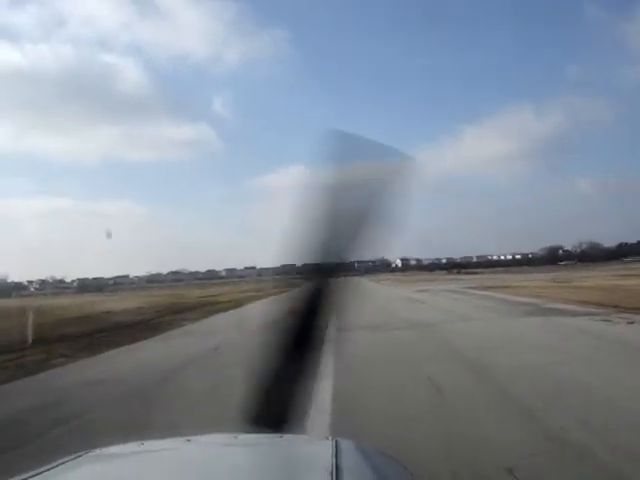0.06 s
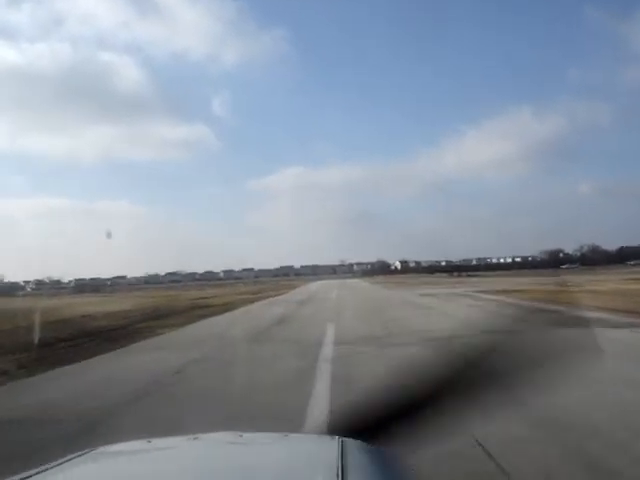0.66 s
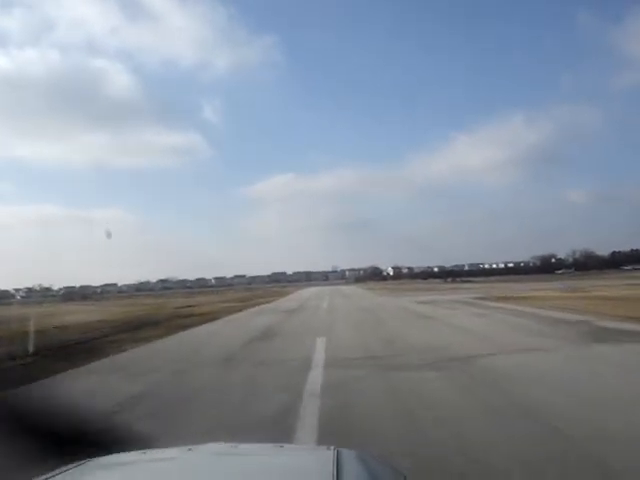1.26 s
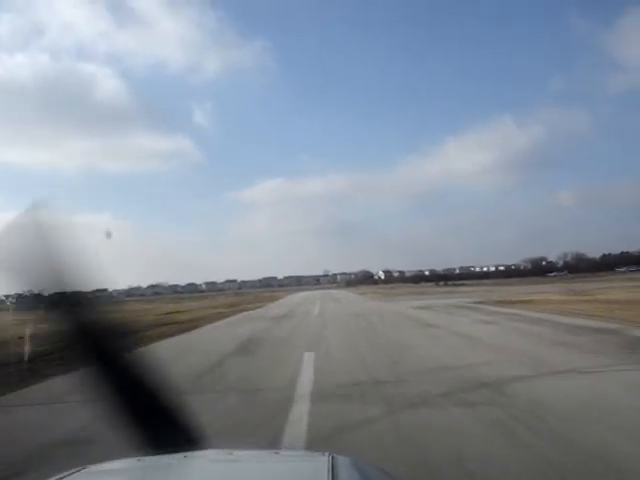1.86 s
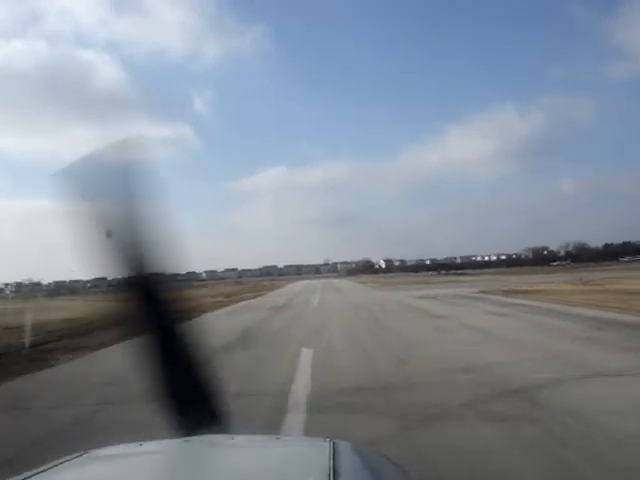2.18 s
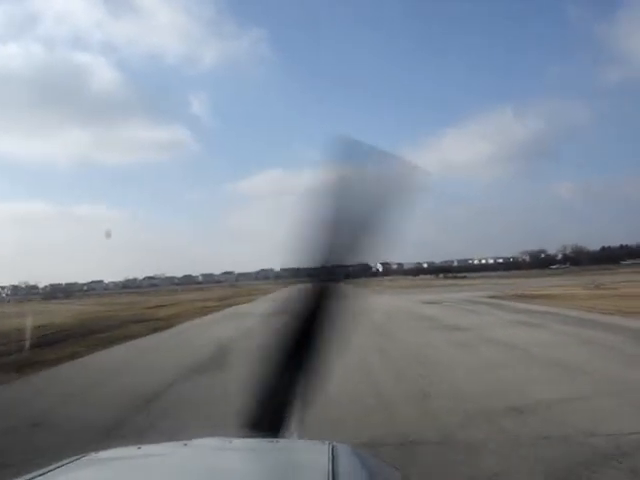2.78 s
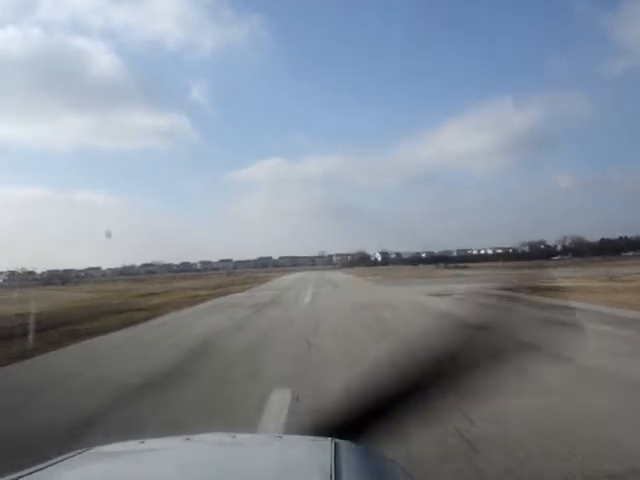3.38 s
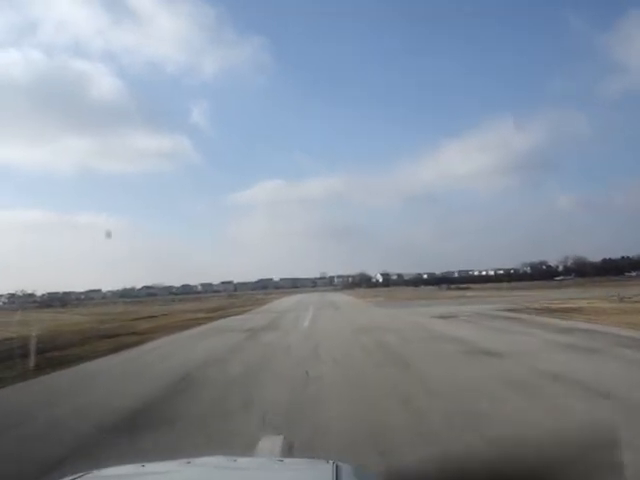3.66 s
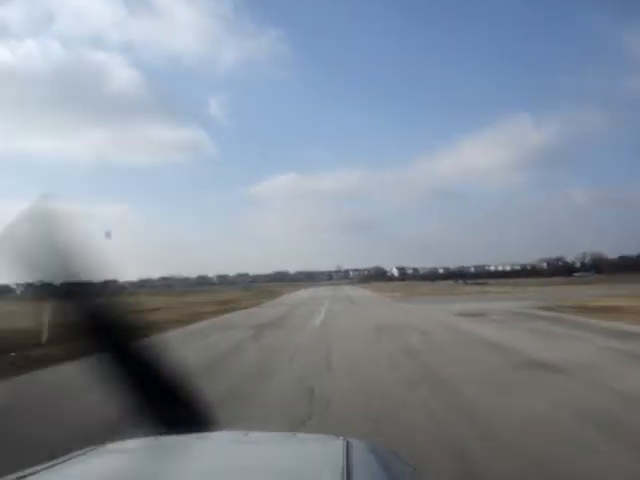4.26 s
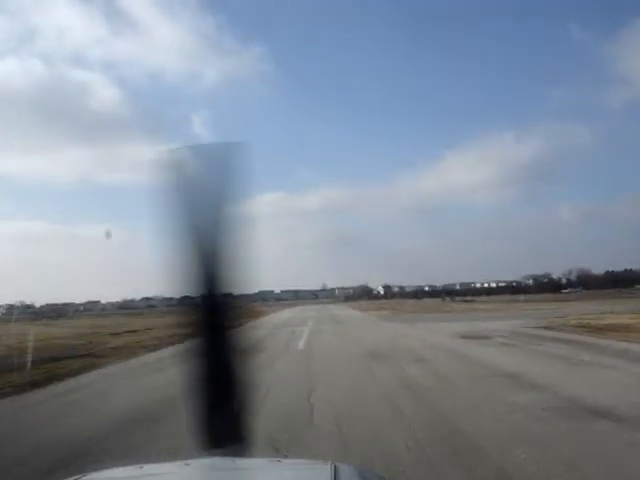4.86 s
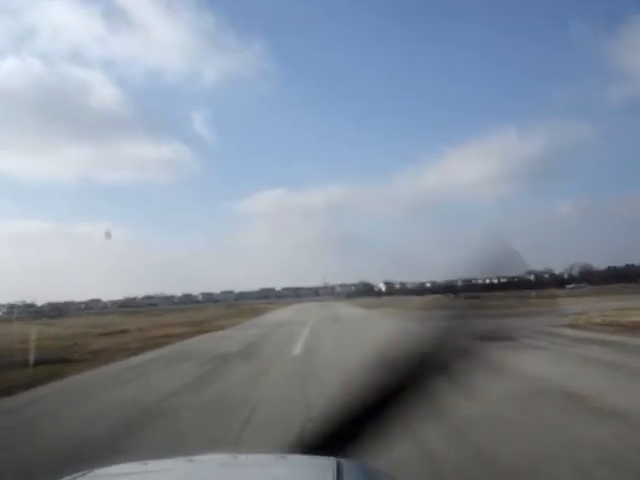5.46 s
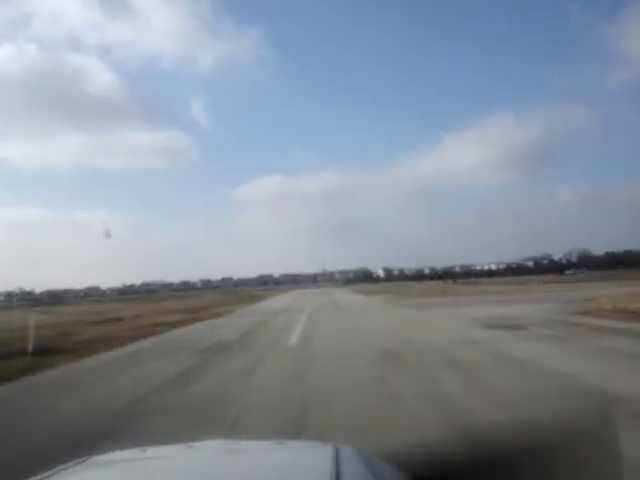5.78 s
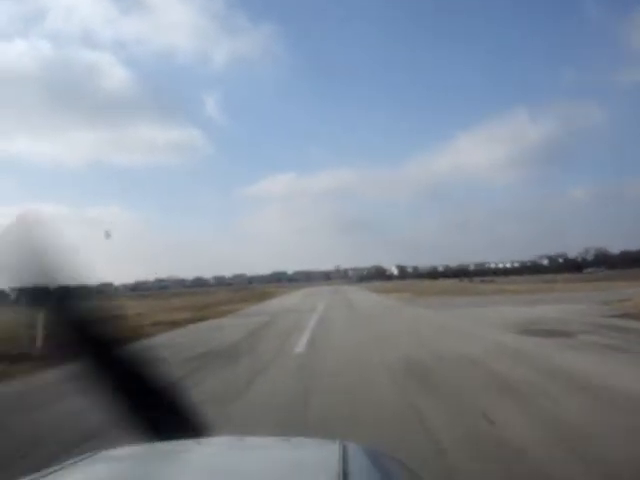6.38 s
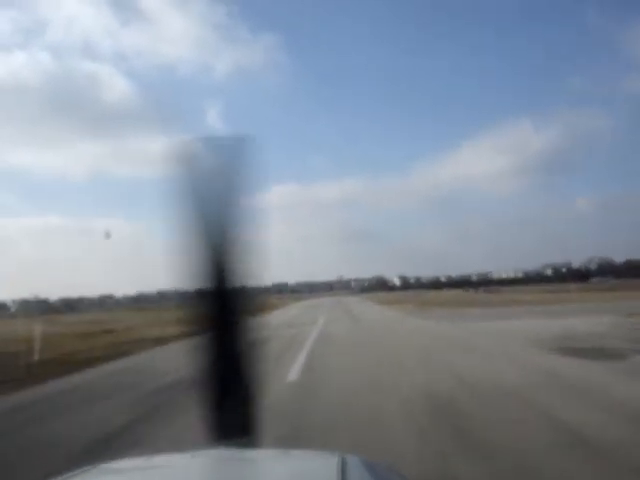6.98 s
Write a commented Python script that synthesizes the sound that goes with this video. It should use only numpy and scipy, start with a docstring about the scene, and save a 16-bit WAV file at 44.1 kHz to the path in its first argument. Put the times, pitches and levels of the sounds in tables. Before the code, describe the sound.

A light aircraft's piston engine and propeller drone for the whole seven seconds, heard from inside the cockpit while taxiing. The engine holds a low, nearly constant speed, with a fast throb, a broad roar and a quickly repeating pattern of knocks that ring in the cabin. The knocks hit harder at about 2 and 3 seconds and briefly soften just after 4. A light panel buzz and a faint, rapid scraping keep time with the engine.

Underneath, tyres rumble on the pavement, swelling briefly over rough patches between 3 and 4.5 seconds and again from about 5.5 to 6.3. Air from the propeller hisses softly on the windscreen. Faint, thin whines hang above, one swelling around 1.5 seconds and again near 6.3. Small dry ticks sound close by at about 0.4, 4.2 and 6.4 seconds.

```python
"""A throbbing, droning engine, heard from the cockpit of a light aircraft taxiing at about 910 rpm.
Four cylinders and a two-blade propeller push the air 30 times a second. The cabin drones, and the same
knocks return every engine cycle (four firings), now and then harder or softer. Tyres rumble over the
pavement, air from the propeller hisses, thin whines hang above and something small ticks a few times."""
import sys
import numpy as np
from scipy.fft import rfft, irfft, next_fast_len
from scipy.io import wavfile
from scipy.ndimage import uniform_filter1d, minimum_filter1d, map_coordinates

SR = 44100
rng = np.random.default_rng(int(sys.argv[2]) if len(sys.argv) > 2 else 0)


def generate_wav(signal):
    """Clip the signal to [-1, 1] and save it as 16-bit WAV at the path in sys.argv[1]."""
    frames = np.transpose(np.atleast_2d(signal))
    scaled = np.clip(frames, -1, 1) * 32767
    pcm = np.round(scaled).astype(np.int16)
    wavfile.write(sys.argv[1], SR, pcm)


N = 309582


def amp(db):
    """Turn decibels into a gain."""
    return 10 ** (np.asarray(db) / 20)


def unit(x):
    """Scale x to an average (rms) level of 1."""
    return x / np.sqrt(np.mean(x ** 2) + 1e-20)


def curve(rows):
    """Join (seconds, value) rows with straight lines, one value per sample."""
    return np.interp(np.arange(N) / SR, *np.transpose(rows))


def wobble(rate):
    """A smooth curve through `rate` random values a second."""
    return map_coordinates(rng.standard_normal(int(N * rate / SR) + 4), [np.arange(N) * rate / SR])


def noise():
    """White noise at level 1."""
    return rng.standard_normal(N)


def filtered(x, response):
    """Multiply each frequency in x by response(hz)."""
    size = next_fast_len(N + SR // 2)
    return irfft(rfft(x, size) * response(np.fft.rfftfreq(size, 1 / SR)), size)[:N]


def coloured(x, spectrum):
    """Shape x by (Hz, dB) rows, fading above the last row, and scale it to level 1."""
    row_hz, row_db = np.transpose(spectrum)

    def response(hz):
        db = np.interp(np.log(hz + 1), np.log(row_hz + 1), row_db)
        return amp(db) / (1 + (hz / row_hz[-1] / 1.3) ** 8)
    return unit(filtered(x, response))


def tone(turns, db, phase=0):
    """A sine wave with one swing per turn, at an average (rms) level of db."""
    return amp(db) * np.sqrt(2) * np.sin(2 * np.pi * turns + phase)


def add(track, start_s, sound):
    """Mix a short sound into the track."""
    start = int(round(start_s * SR))
    if 0 <= start < N:
        track[start:start + len(sound)] += sound[:N - start]


def throb(firings, lag=0.13, unsteady_db=1.0):
    """Each firing and passing blade sends one suck-then-push wave through the cabin."""
    # The tones in that wave. Each row: multiple of the firing rate, level in dB.
    harmonics = [(1, -40.5), (2, -21.5), (3, -21.5), (4, -30), (5, -35.5)]
    return sum(tone(k * (firings - lag), db + unsteady_db * wobble(14)) for k, db in harmonics)


def drone(firings, unsteady_db=2, drift_radians=0.37):
    """Unequal cylinders add in-between tones; those near the cabin's own pitches stand out and waver."""
    # The tones that stand out. Each row: multiple of the firing rate, level in dB.
    cabin_tones = [(3.25, -34.5), (3.5, -37), (7, -42.5), (10, -40.5), (12, -42.5), (14, -36.5),
                   (14.25, -33.5), (14.5, -32.5), (14.75, -34), (16.25, -32), (16.5, -31), (17, -35.5),
                   (19, -40.5), (20.75, -36)]
    out = np.zeros(N)
    for multiple, db in cabin_tones:
        drift = drift_radians * wobble(8)
        level_db = db + unsteady_db * wobble(6)
        out += tone(multiple * firings, level_db, drift + rng.uniform(0, 2 * np.pi))
    return out


def knocks(firings, rise_s=0.0055, jitter_s=0.00022, scatter_db=1.4, burn_db=1.0, detune=0.015):
    """Engine and cover ring at the same points of each cycle; early knocks follow how hard it burns."""
    # One cycle's knocks. Each row: start in firings (0 to 4), pitch in Hz, peak level in dB.
    cycle_knocks = [(0.029, 990, -18), (.22, 1228, -25), (.55, 1440, -33.5), (0.999, 982, -15.5),
                    (1.018, 1622, -27), (1.079, 672, -18), (1.041, 1970, -26.5), (1.3, 1842, -23.5),
                    (1.531, 1808, -27), (1.85, 327, -25.5), (2.0, 697, -23), (2.56, 653, -19),
                    (3.048, 1010, -22.5), (3.55, 720, -15.5)]
    # Cycles that burn unusually hard or weakly. Each row: time in seconds, dB above the usual knock.
    odd_cycles = [(.56, 2), (.96, 2), (1.75, -1), (2.01, 3.5), (2.93, -4), (3.08, 6.5), (3.55, 2),
                  (4.25, -10), (6.1, 3), (6.89, 1.5)]
    t, clock = np.arange(SR // 25) / SR, np.arange(N) / SR
    envelope = (t / rise_s * np.exp(1 - t / rise_s)) ** 3
    cycle_starts = 4 * np.arange(firings[-1] // 4 + 1)
    burns_db = burn_db * rng.standard_normal(len(cycle_starts))
    for time_s, db in odd_cycles:
        cycle = int(np.interp(time_s, clock, firings) // 4)
        burns_db[cycle] = db
    out = np.zeros(N)
    for place, hz, db in cycle_knocks:
        times = np.interp(cycle_starts + place, firings, clock, right=N)  # skip knocks past the end
        peaks_db = db + burns_db * (place < 1.7)  # only the early part of the cycle
        chance = rng.standard_normal((len(times), 3))
        for start_s, peak_db, (late, louder, sharp) in zip(times, peaks_db, chance):
            ring = np.sin(2 * np.pi * hz * (1 + detune * sharp) * (t - rise_s))
            add(out, start_s + jitter_s * late, amp(peak_db + scatter_db * louder) * envelope * ring)
    return out


def exhaust(firings, repeat_share=0.29, level_db=-22):
    """Rushing gas, partly the same in each cycle, makes the cabin ring."""
    # Where the cabin rings. Each row: pitch in Hz, width in Hz, relative strength in dB.
    resonances = [(199.6, 46, -7), (441.2, 25, 1.5), (504, 30, -2), (587, 42, -2.5), (629, 42, 0.5),
                  (700, 65, 0), (765, 68, -4.5), (886, 49, -7.5), (1255, 43, -10), (1409, 43, -12.5),
                  (1550, 60, -13.5), (1838, 121, -9), (2410, 145, -18)]

    def cabin(hz):
        # squared: each resonance acts twice, so the gaps between them stay quiet
        return sum(amp(db) * (1.5j * hz * width / (pitch ** 2 - hz ** 2 + 1.5j * hz * width)) ** 2
                   for pitch, width, db in resonances)
    size = 4096  # samples in one cycle's noise pattern
    pattern = unit(irfft(np.exp(2j * np.pi * rng.random(size // 2 + 1))))
    repeating = map_coordinates(pattern, [firings / 4 % 1 * size], mode="grid-wrap")
    gas = np.sqrt(repeat_share) * repeating + np.sqrt(1 - repeat_share) * noise()
    return amp(level_db) * unit(filtered(gas, cabin))


def roar(firings, level_db=-24, per_firing_db=0.06, per_cycle_db=1):
    """The engine's moving parts make a broad noise that pulses gently with each cycle."""
    # The roar's tone colour. Each row: frequency in Hz, relative level in dB.
    spectrum = [(100, -29.5), (150, -7.5), (370, 0), (545, -3.5), (750, -1.5), (1000, -2.5), (1150, -8),
                (1350, -15.5), (1620, -6), (1980, -8), (2220, -12), (2500, -15.5), (3000, -16.5),
                (3800, -28)]
    pulse_db = per_firing_db * np.cos(2 * np.pi * (firings - 0.3))
    pulse_db += per_cycle_db * np.cos(2 * np.pi * (firings / 4 - 0.25))
    return amp(level_db) * coloured(noise() * amp(pulse_db), spectrum)


def tyres(level_db=-29, uneven_db=1, bump_s=0.05):
    """The wheels rumble, louder over rough pavement."""
    # The rumble's tone colour. Each row: frequency in Hz, relative level in dB.
    spectrum = [(12, -20.5), (28, -5.5), (60, -8.5), (100, -3.5), (135, 2), (200, -0.5), (280, -9),
                (500, -28)]
    # Rough patches. Each row: time in seconds, dB above the usual rumble.
    bumps = [(2.08, 2), (3.02, 5), (3.333, 7), (3.95, 4.5), (4.36, 9), (5.55, 6), (6.0, 5), (6.28, 6.5)]
    t = np.arange(N) / SR
    bumps_db = sum(db * np.exp(-0.5 * ((t - time_s) / bump_s) ** 2) for time_s, db in bumps)
    return amp(level_db + bumps_db + uneven_db * wobble(7.7)) * coloured(noise(), spectrum)


def rattle(firings, peak_db=-32, place=1.4, width=0.32):
    """A panel buzzes briefly after each cycle's loudest firing (place and width count in firings)."""
    from_peak = (firings - place + 2) % 4 - 2
    buzz = coloured(noise(), [(1400, -34.5), (1720, -13.5), (1845, 1.5), (1970, -13), (2400, -36.5)])
    return amp(peak_db) * np.exp(-0.5 * (from_peak / width) ** 2) * buzz


def scrape(firings, peak_db=-36, turns_per_firing=0.554, width_turns=0.069):
    """A part driven by the engine scrapes each time it turns, about 17 times a second."""
    spectrum = [(2300, -19.5), (2800, -9), (3080, -1), (3300, -12.5), (3520, -6), (3850, -19),
                (4500, -28)]
    from_peak = (turns_per_firing * firings - 0.3) % 1 - 0.5
    stroke = np.exp(-0.5 * (from_peak / width_turns) ** 2)
    return stroke * amp(peak_db + 0.61 * wobble(5.6)) * coloured(noise(), spectrum)


def propeller_wash(firings, level_db=-44, pulsing_db=1, flutter_db=1.0):
    """Air thrown back by the blades hisses on the windscreen."""
    # The hiss's tone colour. Each row: frequency in Hz, relative level in dB.
    spectrum = [(1500, -32), (3000, 0.5), (3900, -3.5), (4600, -1), (5600, -1.5), (6500, -7), (7500, -13),
                (8700, -17), (10000, -21.5)]
    gusts_db = pulsing_db * np.cos(2 * np.pi * (firings - 0.9)) + flutter_db * wobble(120)
    return amp(level_db + gusts_db) * coloured(noise(), spectrum)


def ticks(rise_s=0.0035):
    """Something small and close ticks: short bursts of bright noise."""
    # The dry ticks. Each row: start in seconds, level in dB.
    bursts = [(0.423, -34.5), (.466, -33), (4.071, -39.5), (4.259, -39), (4.275, -32.5), (6.41, -28.5),
              (6.45, -33)]
    envelope, t = np.zeros(N), np.arange(SR // 20) / SR
    for start_s, db in bursts:
        add(envelope, start_s, amp(db) * t / rise_s * np.exp(1 - t / rise_s))
    return envelope * coloured(noise(), [(1500, -24), (3500, 5), (5300, -1), (7000, -9), (10000, -16.5)])


def whines(waver_radians=0.36, flutter_db=1.8):
    """Thin, nearly steady tones, probably from spinning instruments; the first swells and fades."""
    # The whines. Each row: pitch in Hz, usual level in dB.
    pitches = [(4456, -57), (3036, -59), (5673, -63), (6073, -70), (6681, -73), (7289, -76), (8301, -80)]
    # The first whine's swell. Each row: time in seconds, dB above its usual level.
    swell = [(0, -7), (1.5, 6), (3.0, 1.5), (3.5, -3), (5.9, -1.5), (6.3, 3), (7.02, -4)]
    t = np.arange(N) / SR
    tones = [tone(hz * t, db + flutter_db * wobble(4), waver_radians * wobble(9)) for hz, db in pitches]
    return amp(curve(swell)) * tones[0] + sum(tones[1:])


def scene():
    """Mix all sources into one channel; a running count of firings keeps the engine sounds in step."""
    # The idle speed wanders a little. Each row: time in seconds, firings a second.
    firing_rate = [(0, 30.22), (0.9, 30.44), (1.8, 30.28), (3.2, 30.32), (3.85, 30.53), (4.55, 30.29),
                   (5.7, 30.59), (7.02, 30.22)]
    firings = np.cumsum(curve(firing_rate)) / SR + 0.031
    engine = throb(firings) + drone(firings) + knocks(firings) + exhaust(firings) + roar(firings)
    engine += rattle(firings) + scrape(firings)
    return (engine + propeller_wash(firings) + tyres() + whines() + ticks())[None]


def record(dry):
    """A limiter briefly turns down the highest peaks, and the very top of the treble is cut off."""
    ceiling, hold_samples, top_hz = 0.65, SR // 100, 10030
    needed_gain = np.minimum(1, ceiling / (np.abs(dry[0]) + 1e-9))
    gain = uniform_filter1d(minimum_filter1d(needed_gain, hold_samples), hold_samples)
    return filtered(dry[0] * gain, lambda hz: hz < top_hz)[None]


dry = scene()
out = record(dry)
generate_wav(out)
```